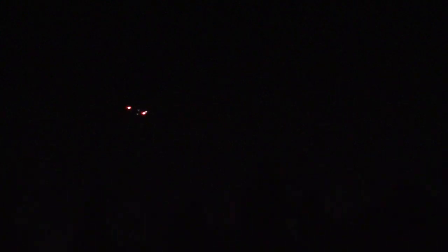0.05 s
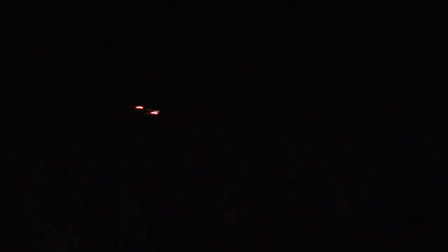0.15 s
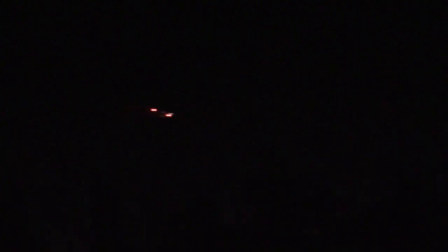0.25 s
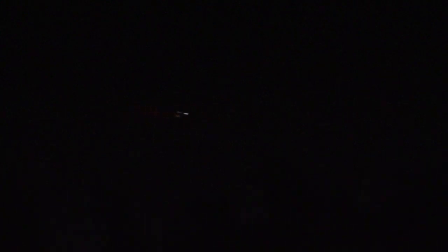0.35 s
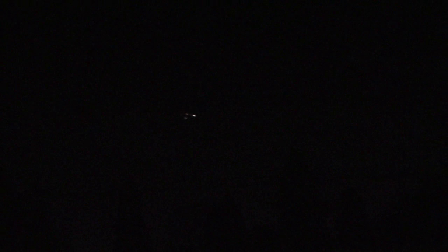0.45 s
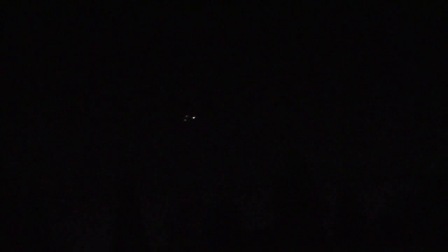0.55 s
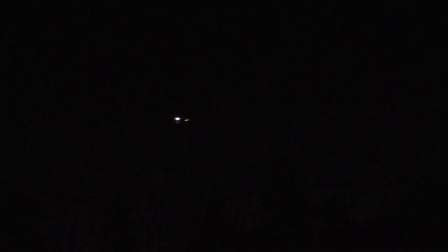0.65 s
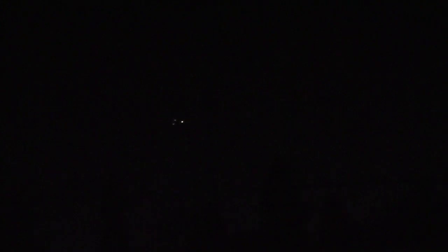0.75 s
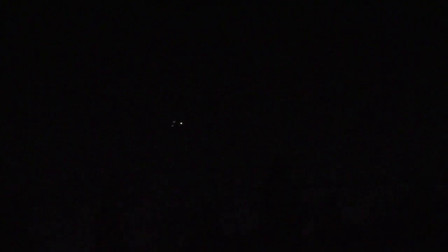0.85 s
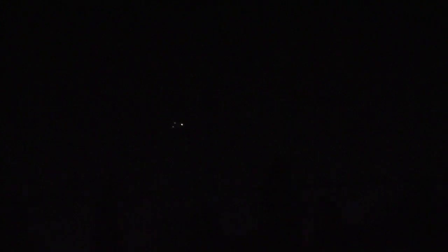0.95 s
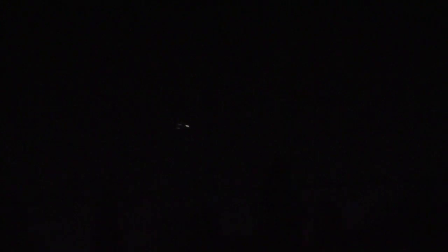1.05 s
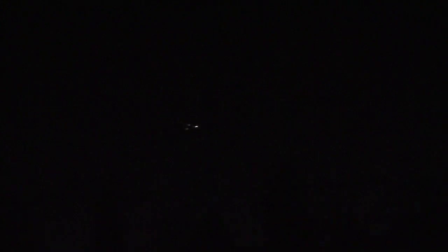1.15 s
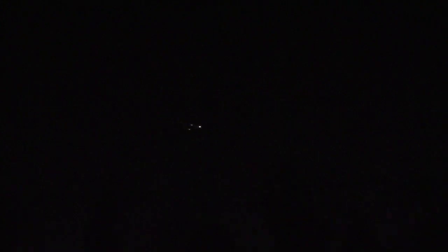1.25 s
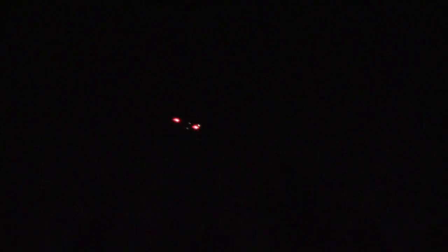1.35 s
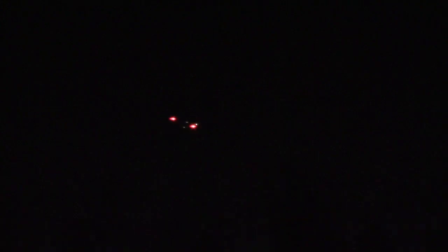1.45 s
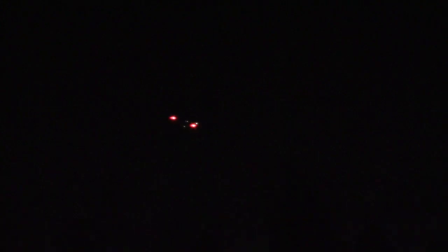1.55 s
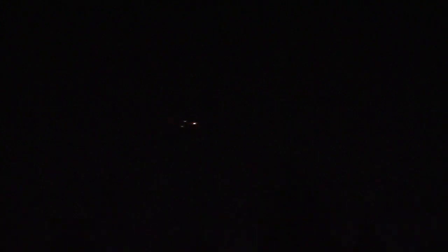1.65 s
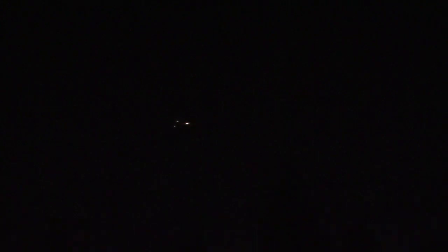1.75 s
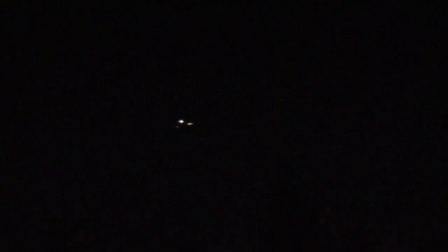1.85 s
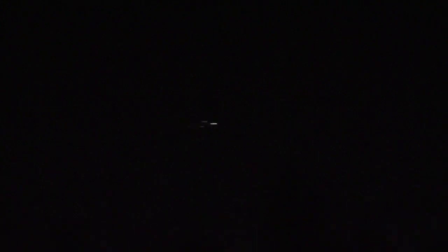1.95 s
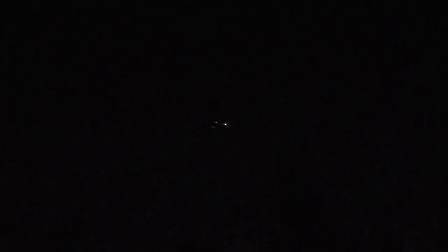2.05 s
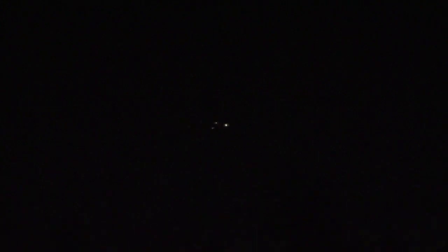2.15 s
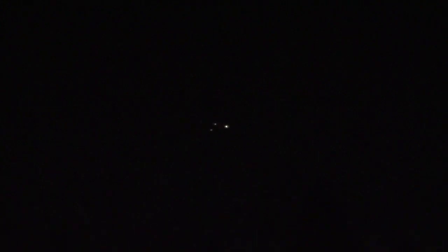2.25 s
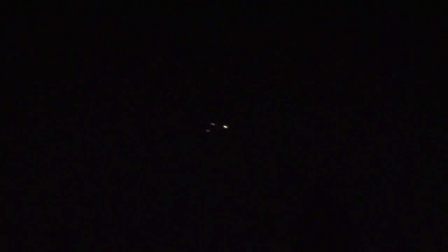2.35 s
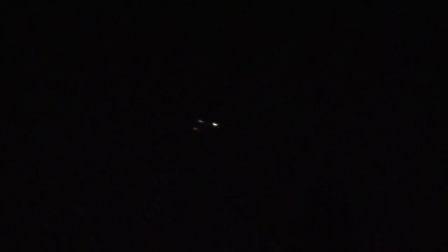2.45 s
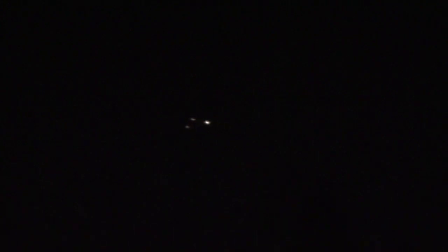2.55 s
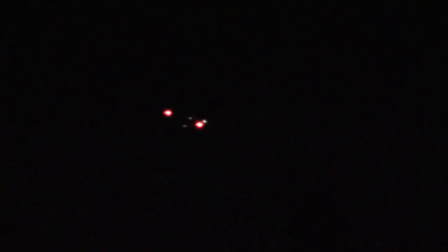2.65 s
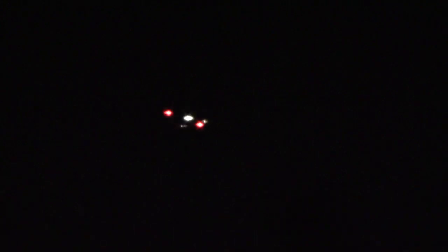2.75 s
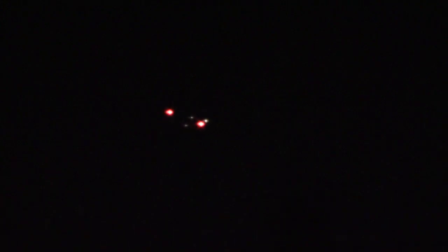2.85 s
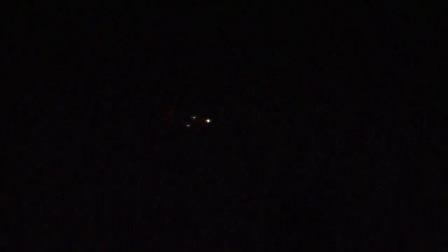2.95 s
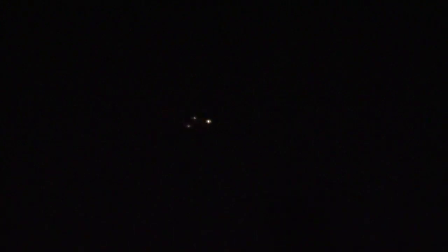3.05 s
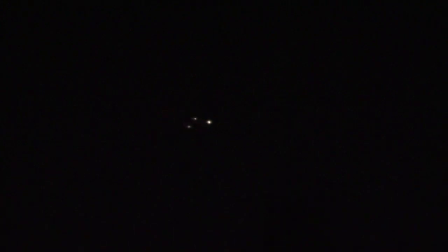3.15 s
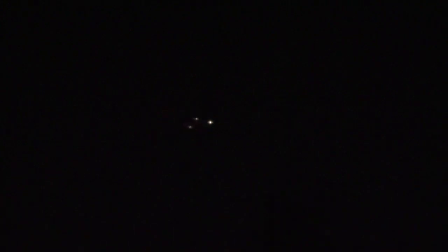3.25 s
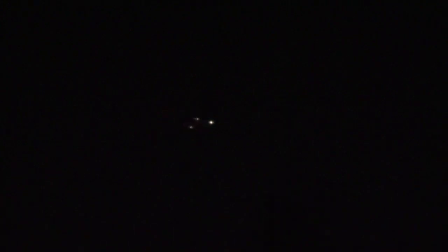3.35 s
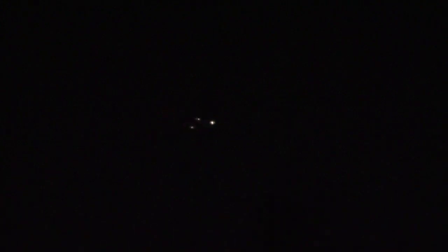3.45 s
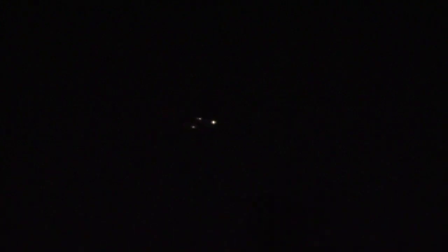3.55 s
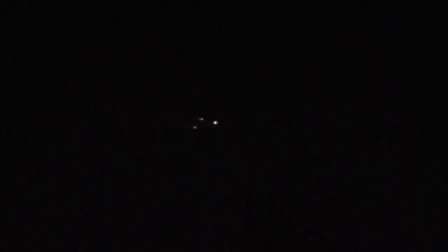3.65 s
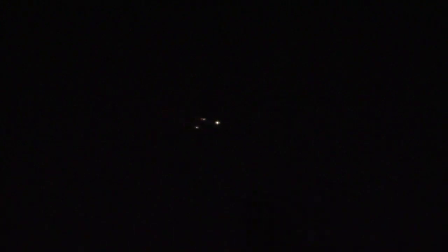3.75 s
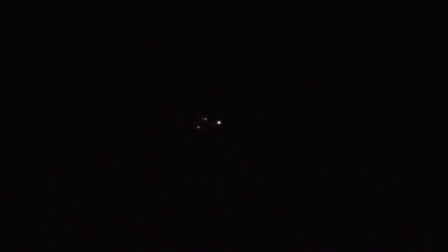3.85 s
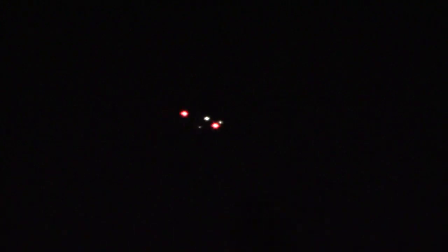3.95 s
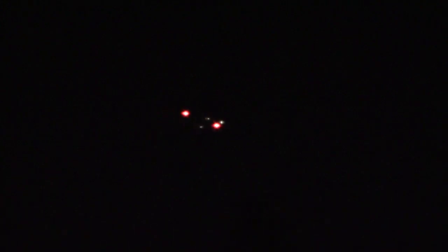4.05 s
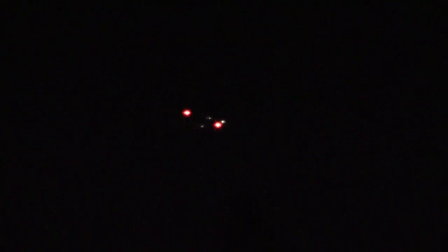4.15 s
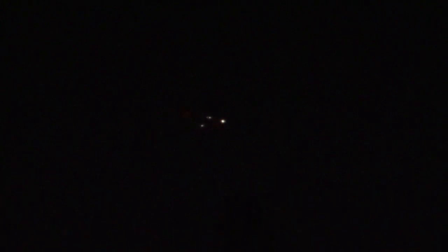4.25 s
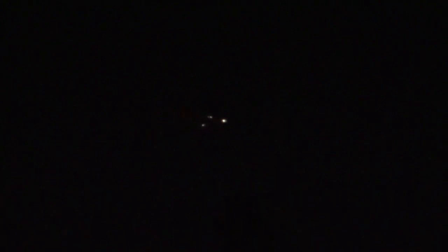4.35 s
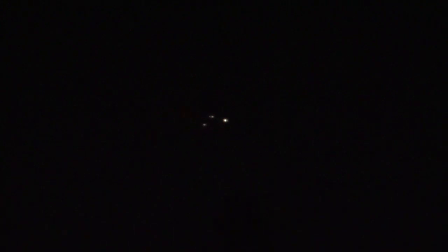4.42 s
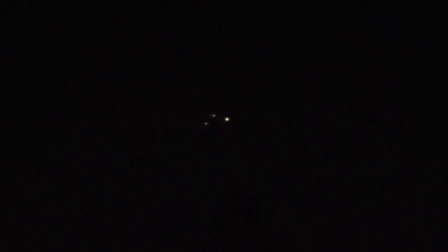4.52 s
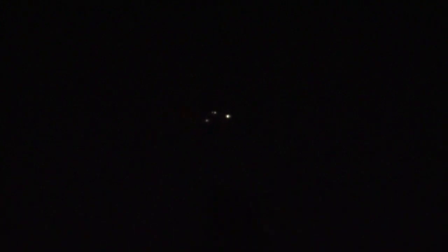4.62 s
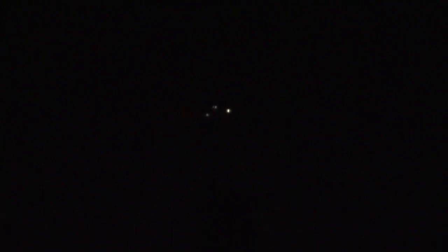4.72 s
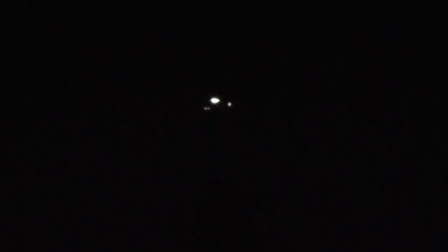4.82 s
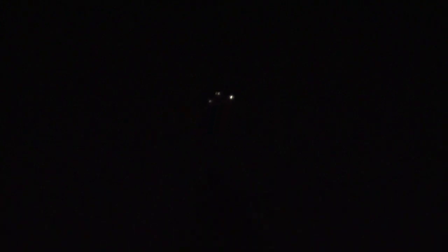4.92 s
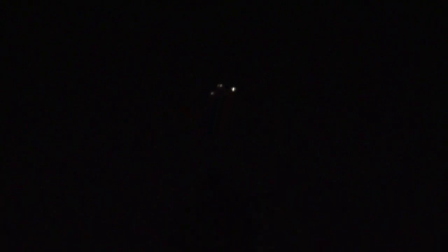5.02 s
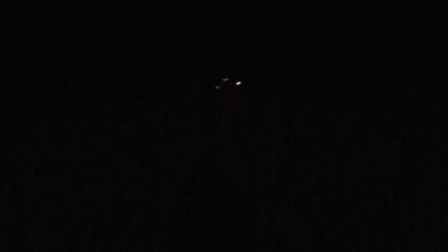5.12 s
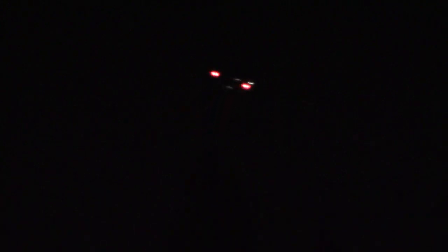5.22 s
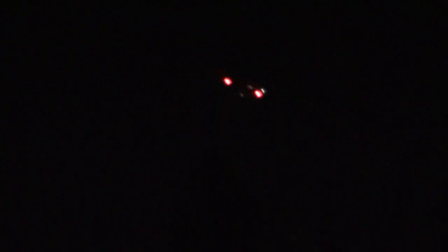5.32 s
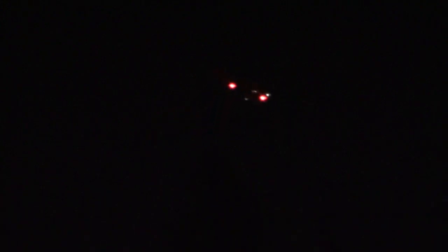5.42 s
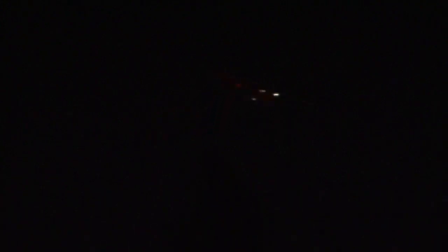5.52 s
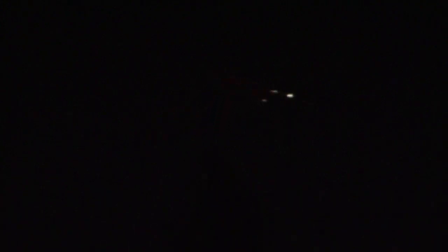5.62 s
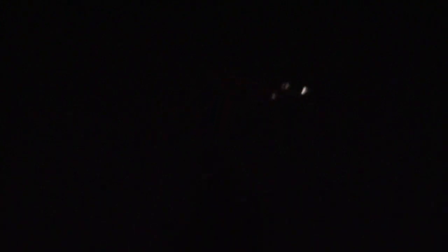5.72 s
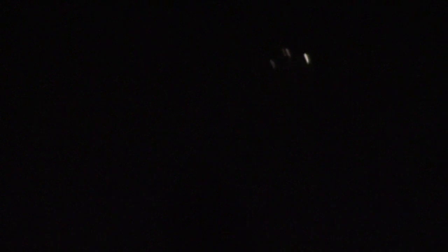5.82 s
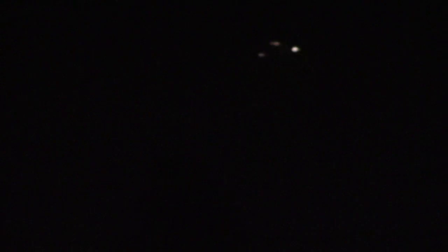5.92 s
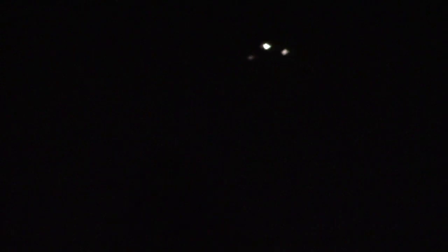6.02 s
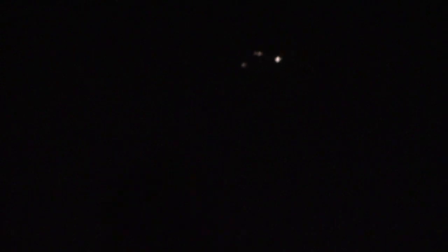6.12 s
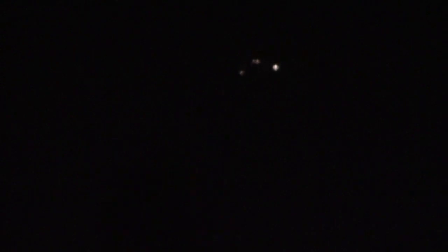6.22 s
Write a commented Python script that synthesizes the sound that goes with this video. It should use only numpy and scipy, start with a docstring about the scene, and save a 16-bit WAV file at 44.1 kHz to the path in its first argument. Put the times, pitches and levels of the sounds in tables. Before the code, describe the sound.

Outdoors at night, faint cricket chirps and tiny close ticks give way to an aircraft's broad roar, building steadily to a hissing overhead pass.

```python
"""A jet passes at night over open ground, heard by a small device with two close microphone ports.
Its rush is turbulent noise shaped in broad humps, one of which glides as the ground echo shifts; the top
treble stays weak until the jet is near, when a high hiss opens. Under it lie night air as steady coloured noise,
a faint cricket as a pulsed sine, and small ticks close by as decaying rings with noise cracks."""
import sys
import numpy as np
from scipy import signal
from scipy.io import wavfile
from scipy.ndimage import map_coordinates

SR = 44100
rng = np.random.default_rng(int(sys.argv[2]) if len(sys.argv) > 2 else 0)


def wav_out(sig):
    """Save sig, one row per channel (or a flat mono array), as 16-bit PCM at SR to the path in sys.argv[1]."""
    wavfile.write(sys.argv[1], SR, np.round(np.clip(np.atleast_2d(sig).T, -1, 1) * 32767).astype(np.int16))


N = 276948  # samples
FRAME, HOP = 2048, 512  # samples
HZ = np.maximum(np.arange(FRAME // 2 + 1) * SR / FRAME, 1)[:, None]  # bin frequencies, as a column
TIME = np.arange(N // HOP + 5) * HOP / SR  # frame times in seconds
SPEED_M_S, NEAREST_S, HEIGHT_M = 194, 5.47, 138  # straight level flight, nearest at NEAREST_S


def undb(db):
    """Logarithmic level: 20 dB is a factor of ten in amplitude."""
    return 10 ** (np.asarray(db) / 20)


def curves(table):
    """Linear interpolation in time: all columns after the first, read at every frame."""
    time_s, *columns = np.transpose(table)
    return [np.interp(TIME, time_s, column) for column in columns]


def colour(points, slide=1):
    """Interpolation over log frequency, moved up by the factor slide and held beyond the ends."""
    hz, value = np.transpose(points)
    return np.interp(np.log(HZ / slide), np.log(hz), value)


def closed(points, slide=1):
    """Band limitation: a colour in dB that is silent beyond its ends."""
    beyond = (HZ / slide < points[0][0]) | (HZ / slide > points[-1][0])
    return np.where(beyond, -200, colour(points, slide))


def hump(hz, octaves):
    """Spectral peak: a Gaussian bell of power over log frequency, with its top of 1 at hz."""
    return np.exp(-.5 * (np.log2(HZ / hz) / octaves) ** 2)


def noise():
    """White noise: the short-time spectrum of a random signal of unit power per Hz."""
    white = rng.standard_normal(HOP * (len(TIME) - 1)) * np.sqrt(SR / 2)
    return signal.stft(white, nperseg=FRAME, noverlap=FRAME - HOP)[2]


def sound(spectrum):
    """Overlap-add synthesis: short-time spectra back to samples."""
    return signal.istft(spectrum, nperseg=FRAME, noverlap=FRAME - HOP)[1][..., :N]


def night():
    """Stationary noise: still air and microphone hiss, as a common and an opposed part."""
    # spectrum of the common part: pitch_hz, level_db (per Hz)
    night_colour = [(25, -100.5), (60, -80.5), (120, -66), (300, -78), (1000, -86.5), (2500, -91.5),
                    (4500, -103), (6500, -110), (9000, -111), (12000, -114), (15500, -119)]
    # opposed part against the common one: pitch_hz, level_db
    night_side = [(30, -22), (500, -31), (3000, -6.5), (6000, -2), (8000, -14.5), (15500, -25)]
    gain = undb(closed(night_colour))
    mid = gain * noise()
    side = gain * undb(colour(night_side)) * noise()
    return sound(np.array([mid + side, mid - side]))


def cricket():
    """Amplitude modulation: a thin, far tone gated into chirps, throbbing with the wing strokes."""
    # chirps, before throb and balance: start_s, length_s, level_db
    chirps = [(0.024, .14, -76), (.22, .07, -74), (.42, .06, -78), (.56, .06, -78), (0.747, .08, -73),
              (.885, .07, -73.5), (1.103, 0.14, -79), (1.374, .31, -79), (1.95, .12, -79), (2.18, .05, -79),
              (2.38, .07, -81)]
    pitch_hz, throb_hz, ramp_s = 5565, 28, .012
    t = np.arange(N) / SR
    gate = undb(-87.5)  # the line stays faintly on between chirps
    for start_s, length_s, level_db in chirps:
        to_edge_s = np.minimum(t - start_s, start_s + length_s - t)
        gate = gate + undb(level_db) * np.clip(to_edge_s / ramp_s, 0, 1)
    throb = 1 + .25 * np.sin(2 * np.pi * throb_hz * t)
    balance = undb(np.array([[-1.5], [1.5]]))  # louder on the right
    return gate * throb * np.sin(2 * np.pi * pitch_hz * t) * balance


def ticks():
    """Damped vibration: dry knocks nearer the left port, a short ring with an overtone and a noise crack."""
    # knocks: start_s, ring_db (scale before envelope and balance), pitch_hz, crack_db (likewise)
    knocks = [(.1804, -56, 8000, -68), (.512, -32, 2900, -66), (1.162, -32, 2900, -60),
              (1.4057, -29, 3150, -42)]
    out, t = np.zeros(N), np.arange(600) / SR
    crack_band = signal.butter(4, [3500, 9500], "bandpass", fs=SR, output="sos")
    for start_s, ring_db, pitch_hz, crack_db in knocks:
        burst = rng.standard_normal(len(t)) * np.exp(-t / .0015)
        crack = signal.sosfilt(crack_band, burst)
        tones = np.sin(2 * np.pi * pitch_hz * t) + .15 * np.sin(2 * np.pi * 1.32 * pitch_hz * t)
        ring = tones * (1 - np.exp(-t / .0004)) * np.exp(-t / .002)
        first = int(start_s * SR)
        out[first:first + len(t)] += undb(ring_db) * ring + undb(crack_db) * crack
    return out * undb(np.array([[1.5], [-1.5]]))


def shimmer(rate, octaves):
    """Random modulation: a smoothed field that changes rate times a second and over so many octaves."""
    grid = rng.standard_normal((120, 120))
    at = np.meshgrid(np.log2(HZ[:, 0]) / octaves, TIME * rate, indexing="ij")
    return map_coordinates(grid, at, order=1, mode="mirror")


def swells():
    """Superposition in dB: patches where the rush swells or thins for a while."""
    # Gaussian patches: centre_s, spread_s, pitch_hz, spread_octaves, level_db
    patches = [(.1, 0.42, 800, .3, -2), (.6, 0.5, 470, .25, 4.5), (.6, .6, 630, .06, -1.5),
               (2.0, .6, 240, 0.33, -3.5), (2.2, 1.05, 1500, 0.16, 3), (2.3, .4, 312, 0.091, 5),
               (3.0, 0.46, 131, 0.51, -3), (3.2, 1.23, 510, 0.14, -4), (3.9, .4, 150, 0.21, 1.5),
               (3.95, 0.34, 780, 0.26, 5), (4.1, 0.2, 1600, 0.14, -4.5), (4.6, 0.26, 406, .15, 2.0),
               (4.8, 0.22, 1920, 0.088, 1.5), (4.95, 0.27, 80, 0.44, 2), (5.2, 0.1, 520, .2, 2.5),
               (5.6, 0.053, 230, 0.3, 5.5), (5.65, .12, 800, 0.15, 0.5), (5.95, .3, 1840, 0.099, -2),
               (6.25, 0.16, 1400, 0.16, 3.5)]
    total_db = 0
    for centre_s, spread_s, pitch_hz, octaves, level_db in patches:
        in_time = np.exp(-.5 * ((TIME - centre_s) / spread_s) ** 2)
        total_db = total_db + level_db * in_time * hump(pitch_hz, octaves)
    return total_db


def narrow_humps(behind):
    """Addition of incoherent powers: the gliding hump, and the core hump on a wider foot."""
    # centre of the gliding hump: time_s, pitch_hz
    glide = [(0, 760), (.5, 838), (3.3, 840), (4.0, 806), (4.7, 670), (5.0, 695), (5.3, 846), (5.7, 780),
             (6.1, 705)]
    # core hump: time_s, pitch_hz, level_db (per Hz, as if overhead)
    core_course = [(0, 1070, -55), (.9, 1000, -55), (1.6, 980, -46), (2.2, 970, -45), (2.9, 960, -49.5),
                   (3.5, 975, -44.5), (3.95, 1035, -56.5), (4.45, 1055, -44.5), (4.8, 1064, -42),
                   (5.0, 990, -42.5), (5.2, 990, -40.5), (5.4, 985, -43.5), (5.6, 965, -40),
                   (5.95, 990, -38.5), (6.28, 1020, -37)]
    (glide_hz,), (core_hz, core_db) = curves(glide), curves(core_course)
    glide_db = -46 - 1.95 * behind  # dB per Hz overhead, and change towards the tail
    gliding = undb(glide_db) ** 2 * hump(glide_hz, octaves=0.2)
    foot = undb(-6.5) ** 2 * hump(core_hz, octaves=0.22)
    core = hump(core_hz, octaves=0.094) + foot
    return gliding + undb(core_db) ** 2 * core


def broad_humps(behind):
    """Spectral shaping: level, pitch and tilt of the wide parts vary along the flight."""
    # spectra of roar, low hump, upper hump, edge and hiss, each: pitch_hz, level_db (within its part)
    roar, low_hump, upper_hump = [(25, -45), (40, -37), (60, -24), (100, -16), (160, -7), (240, 0),
                                  (290, -4), (350, -10), (500, -16), (900, -28)], [(250, -30), (380, -5), (450, 1), (530, 5), (575, 3),
                                                (625, -7), (900, -18)], [(1000, -1.5), (1250, 1.5), (1450, 2),
                                                                  (1700, 4.5), (2000, -5), (2600, -24),
                                                                  (3500, -39)]
    edge, hiss = [(1200, -19), (1900, 4), (2500, -3), (3000, -9.5), (3700, -15), (4150, -22), (4500, -30),
                  (6000, -36)], [(3000, -1), (4500, -5), (5500, -2.5), (6500, -2.5), (7800, -7.5),
                                (9000, -14.5), (11500, -20.5), (13000, -27.5), (15500, -28)]
    # treble parts as if overhead, before tilting:
    # time_s, edge_db (per Hz), edge_tilt (dB per octave), hiss_db (per Hz)
    treble = [(0, -61.5, -21, -88), (.6, -57.5, -7, -89), (1.4, -56.5, -7, -90.5), (2.15, -67, 4, -89.5),
              (2.8, -55, 2.5, -88), (3.4, -59, 5, -90.5), (3.75, -59.5, 1.5, -87), (4.05, -63, 10, -81),
              (4.4, -57.5, 6, -86), (4.8, -55, 6, -74.5), (5.2, -56, 4, -72), (5.75, -58.5, 0.5, -74.5),
              (6.0, -55.5, 4, -78.5), (6.28, -57, 3, -87.5)]
    # dB per Hz overhead, and change from abeam to behind
    roar_db, low_db, upper_db = -42.5 - 1.54 * behind, -49 + 0.19 * behind, -54 + 0.26 * behind
    # pitch as a share of its rest: overhead, and drop from abeam to behind
    roar_slide, upper_slide = 1.01 - 0.036 * behind, 0.94 - 0.07 * behind
    edge_db, edge_tilt, hiss_db = curves(treble)
    # the hiss is darker while the jet approaches and brighter once it has passed
    hiss_tilt = -1.2 + 3.8 * behind  # dB per octave
    edge_db = edge_db + edge_tilt * np.log2(HZ / 2500)
    hiss_db = hiss_db + hiss_tilt * np.log2(HZ / 6000)
    parts = ((roar, roar_slide, roar_db), (low_hump, 1, low_db), (upper_hump, upper_slide, upper_db),
             (edge, 1, edge_db), (hiss, 1, hiss_db))
    return sum(undb(closed(points, slide) + db) ** 2 for points, slide, db in parts)


def two_ports(gain):
    """Directional differences: direct noise differs in level and phase, scattered noise in sign."""
    # where the jet stands for the turning ports: time_s, side (-1 right, 1 left)
    bearing = [(0, 0.78), (2.5, 1.0), (4.75, 0.93), (5.15, 0.43), (5.6, -0.12), (5.9, -0.27), (6.28, -0.59)]
    # left port louder for a source fully to the left: pitch_hz, level_db
    shade = [(60, .2), (500, .3), (950, .5), (1600, 2.2), (2800, 1.6), (4000, 2.0), (6000, 3.8),
             (12000, 3.0)]
    # left port earlier for a source fully to the left: pitch_hz, phase_rad
    lead = [(60, 0), (250, 0), (500, 0.1), (950, 0.1), (1600, 0.03), (2800, 0.48), (4000, 0.52), (6000, .2),
            (12000, .1)]
    # sound scattered by air and ground, before its share by bearing: pitch_hz, level_db (against direct)
    scatter = [(30, -20), (100, -30.5), (250, -28.5), (500, -37), (950, -15), (1600, -12), (2800, -21),
               (4000, -10.5), (6000, -23.5), (9000, -12), (15500, -8)]
    side, = curves(bearing)
    # scattering for a source equally far from both ports, joined by more to one side
    share = np.hypot(undb(-16), undb(-4) * side)
    port = undb(side * colour(shade) / 2) * np.exp(1j * side * colour(lead) / 2)
    direct = gain * noise()
    scattered = gain * undb(colour(scatter)) * share * noise()
    return sound(np.array([direct * port + scattered, direct / port - scattered]))


def jet():
    """Spherical spreading: turbulent noise weakens with distance, and moving air makes it flicker."""
    along_m = SPEED_M_S * (TIME - NEAREST_S)
    distance_m = np.hypot(along_m, HEIGHT_M)
    behind = along_m / distance_m  # -1 head-on, 0 overhead, 1 from the tail
    power = narrow_humps(behind) + broad_humps(behind)
    slow_db = 0.66 * shimmer(rate=5.4, octaves=0.091)
    # the quicker flicker grows with frequency
    quick_db = np.minimum(HZ / 5000, 1.3) * .9 * shimmer(rate=14., octaves=1.225)
    gain = np.sqrt(power) * undb(slow_db + quick_db + swells()) * HEIGHT_M / distance_m
    return two_ports(gain)


def scene():
    """Linear superposition of night, cricket, ticks and jet."""
    return night() + cricket() + ticks() + jet()


def record(dry):
    """Band limiting: a steep elliptic low-pass cuts the top."""
    top_hz = 15700
    return signal.sosfilt(signal.ellip(10, .2, 70, top_hz, fs=SR, output="sos"), dry)


dry = scene()
out = record(dry)
wav_out(out)
```